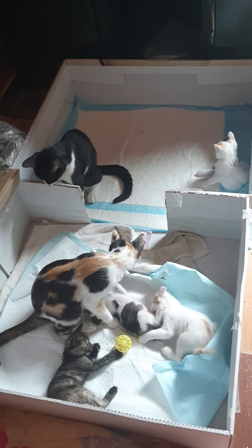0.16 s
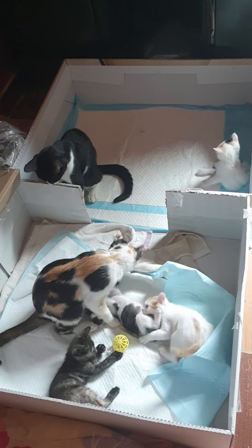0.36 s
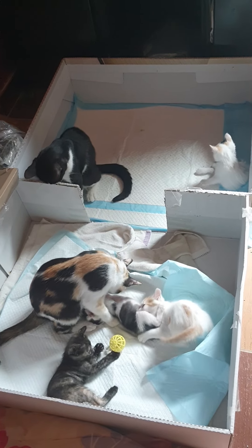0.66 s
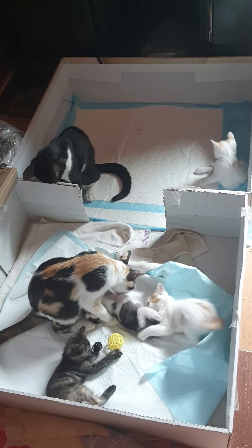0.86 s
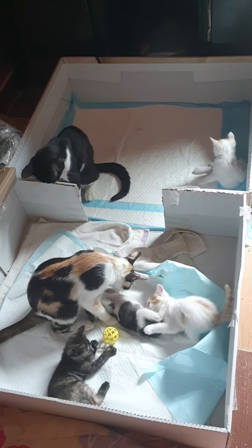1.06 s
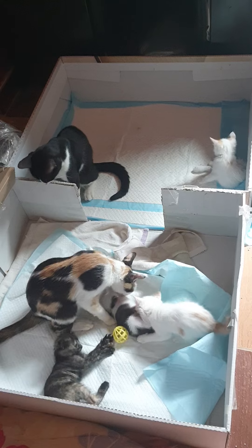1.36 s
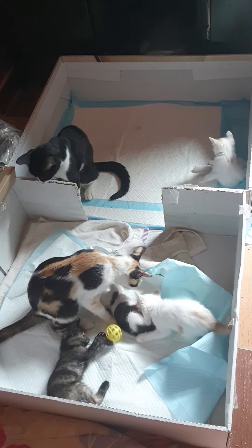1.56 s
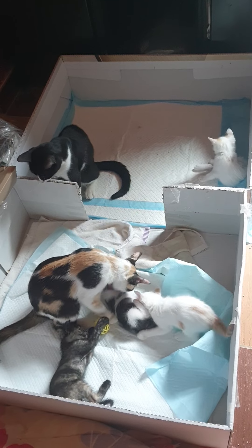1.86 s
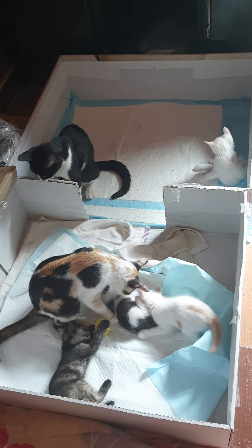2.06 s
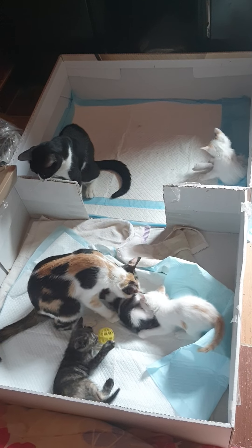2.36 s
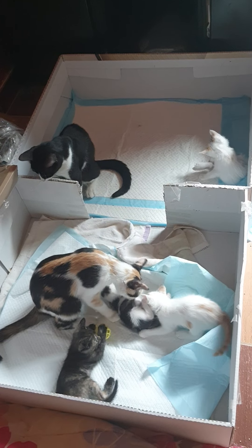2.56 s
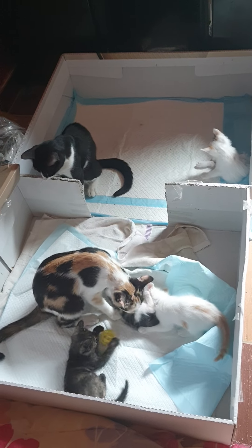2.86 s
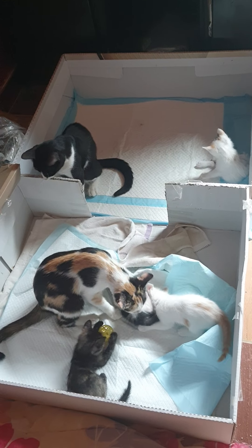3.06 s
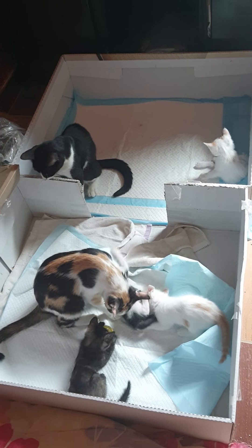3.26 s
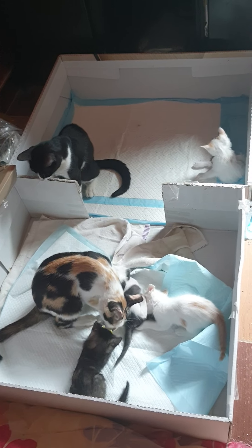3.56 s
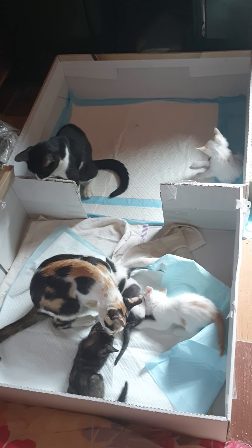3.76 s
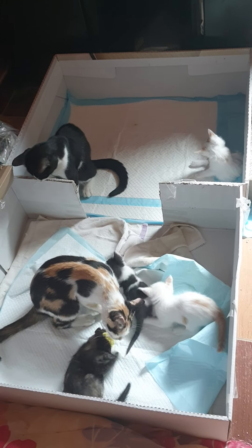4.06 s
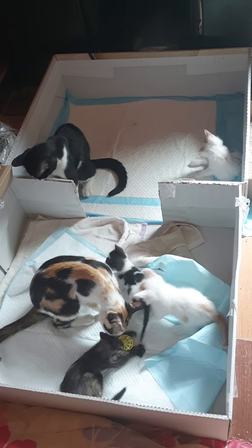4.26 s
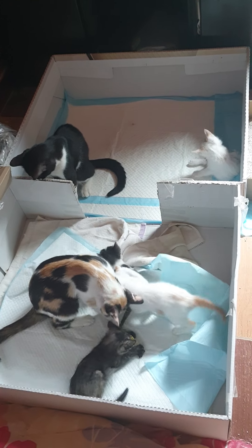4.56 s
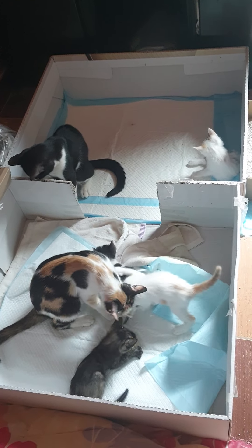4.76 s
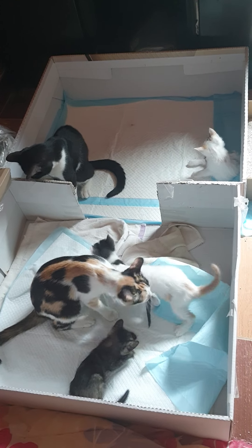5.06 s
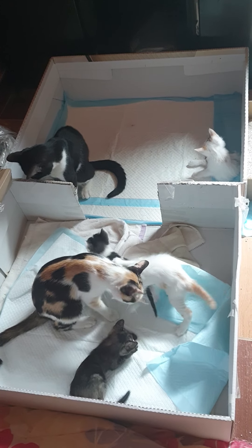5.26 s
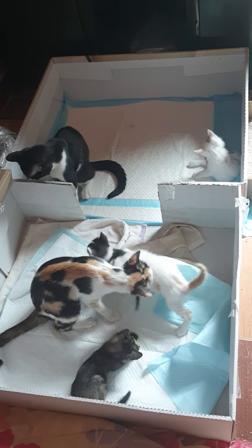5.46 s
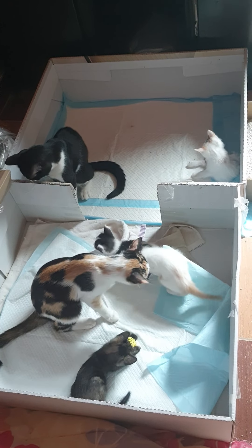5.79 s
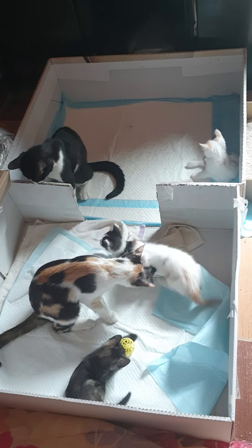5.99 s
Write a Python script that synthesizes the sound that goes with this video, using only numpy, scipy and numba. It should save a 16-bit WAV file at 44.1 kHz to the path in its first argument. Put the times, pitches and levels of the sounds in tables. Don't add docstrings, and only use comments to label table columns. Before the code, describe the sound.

Faint high jingles, thin plastic clicks and crinkling pads come from kittens wrestling in a cardboard pen. Flurries at the start, near the middle and again after four seconds are separated by sparse ticks and quieter dragging. A sharp knock at five seconds and a brief scuffle near the end follow. A constant throbbing low motor drone and airy room noise lie behind, in a small close space, heavier in the right channel.

```python
import sys
import numpy as np
from scipy import signal
from scipy.fft import rfft, irfft, next_fast_len
from scipy.io import wavfile
from scipy.ndimage import uniform_filter1d
from numba import njit

SR = 44100
rng = np.random.default_rng(int(sys.argv[2]) if len(sys.argv) > 2 else 0)


def decibels_to_gain(level_db):
    exponent = np.asarray(level_db, float) / 20
    return 10 ** exponent


def log_audio(samples):
    frames = np.atleast_2d(samples).T
    limited = np.clip(frames, -1, 1)
    pcm = np.round(limited * 32767).astype(np.int16)
    wavfile.write(sys.argv[1], SR, pcm)


N = 270393

# frequency in Hz, right-port level
# in dB rms, left minus right in dB, time in seconds at which it is in step with the first line.
MOTOR_LINES = [(115.98, -43.1, -11.1, 3.0), (112.33, -52.4, -7.5, 3.0412), (111.71, -55.5, -8.5, 2.9725),
               (119.97, -60.3, -8.1, 2.9279), (119.63, -66.5, -5.1, 3.0607), (116.59, -68.1, -5.1, 2.3034),
               (57.99, -53.5, -9.4, 3.0043), (55.86, -56.5, -10.0, 3.0066), (78.46, -63.7, -7.7, 3.0003),
               (87.94, -67.9, -5.8, 3.0121), (101.79, -68.2, -9.3, 2.9899), (167.52, -67.8, -8.3, 2.9944),
               (173.93, -66.8, -7.8, 3.0105), (231.96, -71.5, -8.2, 3.0), (289.64, -72, -11, 3.0),
               (347.97, -74.3, -10.9, 3.0)]


def curve(table, hz):
    table = np.array(table, float)
    return np.interp(np.log(hz + 1), np.log(table[:, 0] + 1), table[:, 1])


def colour(x, gain):
    size = next_fast_len(N, real=True)
    hz = np.arange(size // 2 + 1) * SR / size
    return irfft(rfft(x, size) * gain(hz), size)[..., :N]


def unit(x):
    return x / np.sqrt(np.mean(x ** 2))


def walk(rate):
    hold = int(SR / rate)
    steps = np.repeat(rng.standard_normal(N // hold + 1), hold)
    return uniform_filter1d(uniform_filter1d(steps, hold), hold)[:N]


def ports(pan_db):
    left = decibels_to_gain(np.asarray(pan_db))
    return 2 * np.array([left, np.ones_like(left)]) / (1 + left)


def pen(x, t60, wet_db):
    t = np.arange(int(.4 * SR)) / SR
    tail = rng.standard_normal((2, len(t))) * np.exp(-np.log(1000) * t / t60) * (t > .002)
    tail = tail / np.sqrt(np.sum(tail ** 2, axis=1, keepdims=True))
    return x + decibels_to_gain(wet_db) * signal.fftconvolve(x, tail, axes=1)[:, :N]


@njit
def shell(strike, chatter, roll, pole, keep):
    out, z = np.empty(len(strike)), 0j
    for i in range(len(strike)):
        z = z * pole[i] * roll[i] + chatter[i]
        if strike[i] != 0:
            z = z * keep + strike[i]
        out[i] = z.imag
    return out


def grazes(depth):
    roll = np.ones(N, complex)
    when, size, skip = rng.random((1200, 3)).T
    roll[(when * N).astype(int)] = (0.93 + 0.17 * size) * np.exp(3.5j * depth * (skip - .5))
    return roll


def bell():
    mode_hz = [
        [6831, 6640, 7120],
        [3410, 3500],
        [2975],
        [6000],
        [4590, 5470],
        [13815, 13380, 14095],
        [11580],
    ]
    # level in dB, share of the ring-out, pitch wobble as a share, graze depth in radians.
    modes = [
        [(-1, 0.89, 0.00018, 0.56), (-8, 0.17, 0.0089, 1.1), (-10, 0.18, 0.014, 1.4)],
        [(-3, 1.46, 0.0039, 2.16), (-5.5, 0.64, 0.0078, 1.9)],
        [(-2, 1.84, 0.012, 3.3)],
        [(-4.5, 1.04, 0.0034, 2.3)],
        [(0, 1.2, 0.0078, 2.3), (-6, 0.3, 0.0068, 0.97)],
        [(-5, 0.92, 0.001, 0.97), (-13, 0.5, 0.01, 1.8), (-15, 1, 0.0049, 1.6)],
        [(-0.5, 1.4, 0.0062, 3.3)],
    ]
    # time in seconds, level in dB, ring-out t60 in seconds.
    ring_hits = [(0.113, -57, 0.2), (0.1324, -54.5, 0.18), (0.162, -52, 0.21), (0.183, -46.5, 0.21),
                 (0.2392, -52, 0.47), (0.3057, -44, 0.11), (0.333, -41.5, 0.23), (0.4248, -58, 0.14),
                 (0.583, -65, 0.41), (0.6719, -56, 0.11), (0.7085, -63, 0.16), (0.838, -60, 0.18),
                 (0.9043, -67, 0.18), (1.0164, -56, 0.15), (1.046, -54, 0.21), (1.0816, -55, 0.32),
                 (1.1354, -47, 0.12), (1.2733, -62.5, 0.16), (1.3217, -59.5, 0.31), (1.379, -58, 0.33),
                 (1.4187, -49, 0.2), (1.481, -59, 0.18), (1.5025, -45, 0.11), (1.5341, -47.5, 0.15),
                 (1.5957, -63, 0.32), (1.6976, -55, 0.11), (1.7251, -62, 0.18), (1.8005, -59, 0.15),
                 (1.8584, -57.5, 0.4), (1.947, -61, 0.2), (2.0817, -64, 0.17), (2.1032, -63, 0.21),
                 (6.005, -66, 0.15), (2.494, -53, 0.2), (2.5113, -40, 0.22), (2.5426, -38, 0.074),
                 (2.6476, -56, 0.18), (2.6596, -51, 0.19), (2.709, -47.5, 0.1), (2.817, -59, 0.44),
                 (2.983, -47, 0.068), (3.0143, -46.5, 0.18), (3.1652, -59.5, 0.22), (3.2084, -58, 0.15),
                 (3.237, -69, 0.16), (3.5728, -69, 0.13), (4.074, -66, 0.18), (4.0914, -60.5, 0.28),
                 (4.1904, -66, 0.18), (4.207, -53, 0.21), (4.2385, -50, 0.17), (4.26, -46.5, .12),
                 (4.3291, -66, 0.18), (4.343, -59, 0.18), (4.369, -50, 0.18), (4.3829, -49.5, 0.21),
                 (4.4276, -53, 0.11), (4.4755, -63, 0.16), (4.5131, -43, 0.049), (4.5621, -51, 0.25)]
    slot_hits = [(0.0168, -60.5, 0.36), (0.1061, -52, 0.15), (0.1779, -64, 0.21), (1.1158, -57.5, 0.16),
                 (1.3707, -73, 0.15), (1.3921, -69, 0.15), (1.4081, -64, 0.2), (1.5762, -65, 0.15),
                 (1.699, -67, 0.13), (1.727, -45.5, 0.15), (1.7957, -52, 0.073), (2.5405, -60.5, 0.21),
                 (2.6593, -52, 0.1), (2.6912, -54.5, 0.16), (2.8418, -65, 0.1), (2.9546, -62.5, 0.2),
                 (2.978, -59, 0.13), (3.1157, -64.5, 0.094), (4.0825, -71, 0.15), (4.2521, -47, 0.066),
                 (4.2746, -58.5, 0.23), (4.374, -54, 0.2), (4.41, -59.5, 0.18), (4.556, -66, 0.16)]
    lowest_hits = [(1.3627, -71, 0.15), (1.44, -65, 0.27), (1.6156, -66, 0.14), (1.6989, -65, 0.15),
                   (1.7348, -72, 0.15), (1.8022, -55, 0.074), (1.856, -65, 0.19), (2.518, -57.5, 0.16),
                   (2.545, -51.5, 0.11), (2.6283, -77, 0.13), (2.6607, -60.5, 0.14), (2.842, -64, 0.16),
                   (2.978, -63, 0.23), (3.2075, -82, 0.15), (4.0955, -74, 0.17), (4.211, -59, 0.15),
                   (4.2387, -55, 0.15), (4.2628, -56.5, 0.13), (4.369, -55, 0.098), (4.406, -60, 0.1),
                   (4.5554, -60.5, 0.13), (4.6128, -69, 0.21), (6.01, -65, .15)]
    sixth_hits = [(0.1066, -66, 0.18), (0.152, -59, 0.18), (0.2472, -68, 0.18), (0.2767, -56, 0.2),
                  (0.3106, -68, 0.18), (0.3335, -64, 0.2), (0.356, -55, 0.18), (1.1487, -56, 0.18),
                  (1.7249, -62, 0.18), (1.7576, -59, 0.18), (2.5071, -69, 0.18), (2.5405, -52, 0.2),
                  (2.68, -50, .2), (3.035, -60, .2), (2.6598, -49, 0.23), (2.976, -58, 0.18),
                  (3.011, -57, 0.18), (3.1586, -72, 0.18), (3.1776, -58, 0.18), (4.0975, -71, 0.18),
                  (4.1329, -58, 0.18), (4.1983, -62, 0.18), (4.2167, -56, 0.18), (4.2501, -56, 0.18),
                  (4.3403, -53, 0.29), (4.5549, -65, 0.18), (5.99, -63, .3)]
    middle_hits = [(0.105, -60, 0.12), (1.7249, -60, 0.16), (1.8003, -62, 0.1), (2.5405, -65, 0.12),
                   (2.6595, -58, 0.12), (2.68, -62, 0.18), (2.7017, -60, 0.15), (4.3, -63, .12),
                   (4.37, -60, 0.19), (4.2106, -60, 0.13), (4.2497, -52, 0.1), (4.2794, -67, 0.12),
                   (4.5542, -60, 0.12)]
    top_hits = [(0.0852, -63, 0.15), (0.1072, -57, 0.15), (0.1226, -49, 0.15), (0.1875, -54, 0.15),
                (0.2733, -51, 0.15), (0.3328, -45, 0.18), (0.6729, -56, 0.15), (0.8395, -55, 0.15),
                (1.056, -54, 0.15), (1.0779, -52, 0.16), (1.1343, -50, 0.17), (1.1517, -49, 0.093),
                (1.2725, -56, 0.17), (1.3623, -54, 0.15), (1.3982, -57, 0.15), (1.5125, -61, 0.15),
                (1.5482, -42, 0.086), (1.6975, -61, 0.17), (1.7255, -55, 0.15), (1.7409, -52, 0.17),
                (1.783, -45.5, 0.16), (1.8587, -59, 0.17), (2.103, -57, 0.14), (2.5102, -54, 0.15),
                (2.5237, -56, 0.15), (2.5531, -44, 0.15), (2.574, -48, 0.097), (2.6604, -49, 0.15),
                (2.7048, -57, 0.12), (2.826, -67, 0.15), (2.8424, -59, 0.15), (2.9382, -59, 0.14),
                (2.9547, -53, 0.15), (2.9761, -55, 0.15), (2.9916, -48, 0.19), (3.1597, -64, 0.15),
                (3.1742, -60, 0.15), (4.2103, -61, 0.15), (4.2512, -44, 0.12), (4.3425, -53, 0.15),
                (4.4358, -52, 0.13), (4.5057, -51, 0.15), (4.5296, -48, 0.15), (4.5545, -50, 0.14)]
    shoulder_hits = [(0.2738, -57, 0.08), (1.2729, -64, 0.08), (1.3622, -56, 0.08), (1.7249, -53.5, 0.044),
                     (1.8053, -58, 0.08), (2.5419, -53, 0.08), (2.6598, -57, 0.1), (2.8414, -61, 0.08),
                     (2.9756, -53, 0.08), (4.2106, -53, 0.074), (4.3644, -55, 0.08), (4.5096, -50, 0.08)]
    family_pans_db = [-13.5, -6.5, -13, -6, 2, -6.5, 2]
    chatters_db = [-17.5, -13, -14, -13, -14, -12, -22]
    chatter_per_s, chatter_t60_s, turn_db = 170, 0.36, 2.5

    families = ring_hits, slot_hits, lowest_hits, sixth_hits, middle_hits, top_hits, shoulder_hits
    out = np.zeros((2, N))
    rattle = (rng.random(N) < chatter_per_s / SR) * rng.standard_normal(N)
    chatter_decay = decibels_to_gain(-60 / (chatter_t60_s * SR))
    for hzs, family, hits, family_pan_db, chatter_db in zip(mode_hz, modes, families, family_pans_db, chatters_db):
        s, db, t60 = np.transpose(sorted(hits))
        at = (s * SR).astype(int)
        latest = np.maximum(np.searchsorted(at, np.arange(N), "right") - 1, 0)
        ring_out = np.clip(t60, .02, .6)[latest]
        pan_db = family_pan_db + turn_db * rng.standard_normal(len(s))
        for hz, (mode_db, share, wobble, graze) in zip(hzs, family):
            loss = np.log(1000) / (share * ring_out * SR)
            pole = np.exp(2j * np.pi * hz * (1 + wobble * walk(25)) / SR - loss)
            roll = grazes(graze)
            scatter_db = 3 * rng.standard_normal((len(s), 2)).T * (hz != hzs[0])
            near = signal.butter(1, [hz - 250, hz + 250], "band", fs=SR, output="sos")
            for port, gain in enumerate(ports(pan_db)):
                strike = np.zeros(N, complex)
                phase = np.exp(2j * np.pi * rng.random(len(s)))
                strike[at] = gain * decibels_to_gain(db + mode_db + scatter_db[port]) * phase
                unrest = signal.lfilter([decibels_to_gain(chatter_db)], [1, -chatter_decay], np.abs(strike))
                ring = shell(strike, rattle * unrest, roll, pole, 0.18)
                out[port] += signal.sosfilt(near, ring)
    return pen(out, t60=0.26, wet_db=-6)


def burst(hz, t60, width):
    t = np.arange(int(.15 * SR)) / SR
    edges = np.clip([hz / (1 + width), hz * (1 + width)], 50, 20000)
    push = rng.standard_normal(len(t)) * np.exp(-np.log(1000) * t / t60)
    push[0] = 1.5
    x = signal.sosfilt(signal.butter(3, edges, "band", fs=SR, output="sos"), push)
    return x / np.abs(x).max()


def add(out, x, s):
    i = int(s * SR)
    out[:, i:i + x.shape[1]] += x[:, :N - i]


def contacts():
    # time in seconds, peak in dB, centre in
    # Hz, broad crack in dB.
    ticks = [(0.2725, -46, 7260, -61), (0.3035, -45, 10400, -73), (0.329, -47, 7300, -73),
             (0.4568, -58, 9960, -86), (0.571, -58, 8200, -80), (0.6814, -57, 7330, -78),
             (0.7085, -48.5, 7300, -78), (0.815, -54, 7510, -73), (0.9537, -50, 7700, -60.5),
             (1.0211, -59, 10400, -76), (1.135, -49, 7150, -66), (1.1904, -69, 7480, -61.5),
             (1.2726, -60, 11600, -69), (1.3622, -54, 11500, -62), (1.398, -49, 7200, -70),
             (1.466, -52, 10500, -59), (1.503, -50, 7220, -68), (1.53, -48, 7540, -73),
             (1.6172, -69, 10700, -73), (1.698, -50, 7950, -68), (1.726, -43, 7300, -58),
             (1.8058, -55, 11600, -65), (1.854, -54, 7250, -74), (1.8821, -50.5, 10500, -75),
             (1.8914, -57, 11000, -77), (2.1021, -64, 7400, -86), (2.5026, -55, 7300, -75),
             (2.5264, -51, 10300, -67), (2.542, -53, 9000, -60), (2.66, -46, 11800, -50.5),
             (2.8409, -59, 11700, -72), (2.9539, -50, 12500, -64), (2.976, -44, 7150, -69),
             (3.3235, -64, 10600, -70), (3.571, -52, 8260, -71), (3.767, -73, 7720, -69),
             (3.9303, -67, 7230, -61), (4.0745, -59, 10600, -71), (4.211, -43.5, 11000, -51.5),
             (4.2507, -50, 9600, -48), (4.342, -42.5, 7600, -59), (4.3507, -41.5, 10200, -66),
             (4.3694, -46, 11500, -57), (4.5036, -42, 10700, -56), (4.556, -54, 7900, -50.5),
             (5.1002, -45.5, 7400, -57), (5.3512, -66, 10600, -86), (5.6725, -60, 10600, -81),
             (5.7235, -61, 10500, -56), (5.939, -61, 11700, -70),
             (2.495, -59, 10400, -78), (2.513, -57, 10800, -74), (2.692, -55, 8000, -70),
               (2.77, -62, 10500, -78), (2.995, -52, 8500, -68), (3.01, -54, 7600, -70),
               (3.03, -59, 8200, -72), (4.222, -52, 7200, -66), (4.512, -49, 10000, -70)]
    # time in seconds, peak in dB, centre in Hz, t60 in seconds, width as a share.
    knocks = [(0.88, -58, 2300, .14, .2), (0.952, -49, 1850, .014, 0.41), (1.002, -64, 1490, 0.03, 0.21),
              (1.466, -50.5, 1900, 0.059, 0.39), (1.646, -44, 940, 0.014, 0.2),
              (1.649, -63, 980, .08, 0.12), (4.96, -46, 334, 0.15, 0.23), (5.1, -47, 716, 0.0087, 0.34),
              (4.253, -45, 3450, .03, .08), (4.253, -48, 4650, .03, 0.067), (4.556, -55, 4600, .03, .08),
              (4.256, -47, 13300, .04, .06), (5.099, -41.5, 2230, 0.012, 0.16),
              (5.1, -55, 5140, 0.14, 0.13), (5.1, -51, 11000, .02, .4), (5.104, -50.5, 2530, 0.2, 0.13),
              (5.109, -51, 2300, 0.16, .2), (5.105, -52, 1750, 0.15, 0.18), (5.112, -61, 7600, 0.17, 0.23),
              (5.7235, -46, 4600, .015, 0.14), (5.7253, -47, 1400, 0.014, 0.45),
              (5.76, -46.5, 800, 0.038, 0.89), (5.786, -44, 5200, .02, .3), (5.8, -49.5, 705, 0.035, 0.85),
              (5.825, -45.5, 3630, 0.036, 0.45)]
    out = np.zeros((2, N))
    for s, db, hz, crack_db in ticks:
        ring = decibels_to_gain(db + 1.6) * burst(hz, 0.022, 0.096)
        snap = decibels_to_gain(db + 2) * burst(10500, .004, 0.66)
        crack = decibels_to_gain(crack_db + 15.5) * burst(6400, 0.0058, 0.49)
        pan_db = -10.5 + 0.5 * rng.standard_normal()
        add(out, np.outer(ports(pan_db), ring + snap + crack), s)
    for s, db, hz, t60, width in knocks:
        add(out, np.outer(ports(-4.5), decibels_to_gain(db) * burst(hz, t60, width)), s)
    return pen(out, t60=0.29, wet_db=-6)


def rustle():
    # start in seconds, hold in seconds, level in dB, dullness in dB.
    drags = [(0, 0.14, -70.5, -6), (0.149, 0.044, -64.5, 0), (0.222, 0.15, -72.5, 5.5),
             (0.592, 0.049, -73.5, 2), (0.673, .05, -83, -2), (0.837, 0.12, -69, 3),
             (1.002, 0.16, -75.5, 0), (1.364, 0.18, -70.5, 2), (1.29, 0.055, -76, -9),
             (1.537, 0.4, -77, -10), (2.106, 0.023, -84, -6), (1.64, 0.083, -82, 16.5),
             (2.499, 0.054, -71.5, -14), (2.665, 0.21, -75, 2), (2.935, 0.28, -78.5, -10),
             (2.974, 0.032, -71, -6), (3.205, 0.023, -74, 6.5), (3.344, 0.028, -69, 3),
             (3.574, 0.017, -76, -3), (3.88, 0.15, -76.5, 5.5), (4.08, 0.063, -71, -5),
             (4.209, 0.045, -64, -1.5), (4.34, 0.076, -66, -4), (4.458, 0.17, -72, 1),
             (5.104, 0.07, -84, 20), (5.042, 0.059, -86, 1), (5.247, 0.041, -86, 8), (5.708, .015, -74, -6),
             (5.736, 0.082, -67, 8), (5.955, 0.056, -71.5, -3), (6.032, 0.055, -65, 2)]
    # frequency in Hz, level in dB per Hz.
    crinkle = [(2500, -11.5), (3900, -5), (5300, -0.5), (7000, 2.5), (13000, 1), (15800, 0.5)]
    padding = [(400, 13.5), (900, 6.5), (1500, 0.5), (2400, 1.5), (3600, -6), (5500, -22)]
    grip_db_per_s, let_go_db_per_s = 420, 150
    rest_db, rest_dull_db = -87.5, 11
    spread_db, flicker_db = 1.6, 1.4

    t = np.arange(N) / SR
    crisp, soft = decibels_to_gain(2 * rest_db), decibels_to_gain(2 * (rest_db + rest_dull_db))
    for s, hold, db, dull_db in drags:
        swell_db = grip_db_per_s * (s - t)
        die_db = let_go_db_per_s * (t - s - hold)
        power = decibels_to_gain(2 * (db - np.maximum(0, np.maximum(swell_db, die_db))))
        crisp = crisp + power
        soft = soft + power * decibels_to_gain(2 * dull_db)
    snaps = rng.random((2, N)) < 1800 / SR
    size_db = spread_db * np.minimum(rng.exponential(size=(2, N)), 4)
    creases = snaps * decibels_to_gain(size_db) * rng.standard_normal((2, N))
    creases = creases * decibels_to_gain(flicker_db * walk(40))
    film = unit(colour(creases, lambda f: decibels_to_gain(curve(crinkle, f)) * (f > 1500)))
    pad = unit(colour(creases, lambda f: decibels_to_gain(curve(padding, f)) * (f > 250)))
    film = decibels_to_gain(6.5) * np.sqrt(crisp) * film * ports(-5.0)[:, None]
    pad = decibels_to_gain(1.72) * np.sqrt(soft) * pad * ports(-8.5)[:, None]
    return pen(film + pad, t60=0.044, wet_db=0)


def motors():
    # time in seconds, level change in dB.
    load = [(0, -0.2), (.8, 1.9), (1.3, 0), (2.4, 0.5), (3.0, -0.9), (3.9, -.6), (4.6, -0.5), (5.3, .3),
            (6.13, 0.7)]
    # time in seconds, level in dB rms.
    pump_level = [(0, -59), (0.5, -44.5), (1.4, -54), (1.8, -61), (2.6, -52), (3.2, -64), (4.0, -71),
                  (4.4, -64), (4.8, -69), (6.13, -59)]
    t, lead, out = np.arange(N) / SR, MOTOR_LINES[0][0], 0
    load_db = np.interp(t, *np.transpose(load))
    for hz, db, pan_db, s in MOTOR_LINES:
        line = np.sqrt(2) * np.sin(2 * np.pi * (lead * t + (hz - lead) * (t - s)))
        level = decibels_to_gain(db + load_db + 0.15 * walk(2.1))
        out = out + np.outer([decibels_to_gain(pan_db), 1], level * line)
    pump = np.sqrt(2) * np.cos(2 * np.pi * 91.48 * t)
    pump = decibels_to_gain(np.interp(t, *np.transpose(pump_level))) * pump
    return out + np.outer([decibels_to_gain(-10.0), 1], pump)


def air():
    # frequency in Hz, level in dB per Hz.
    spectrum = [(25, -40), (40, -20), (55, -5), (90, -7), (145, -14.5), (206, -17), (340, -18), (520, -24),
                (754, -32.5), (1480, -35), (3820, -54.5), (5880, -55.5), (7310, -47), (13200, -56)]
    # frequency in Hz, left minus right in dB.
    air_pan = [(60, -15.5), (110, -13.5), (200, -8), (380, -4.5), (700, -7.5), (1290, -14), (2380, -11),
               (4400, -4), (8120, -23), (15000, -22)]
    # frequency in Hz, likeness of the two ports from 0 to 1.
    likeness = [(130, 0.83), (290, 0.9), (640, 0.37), (1400, 0.1)]
    # frequency in Hz, width in Hz, boost in dB.
    room_modes = [(141, 16, 7.5), (172, 6.6, 9.5), (186, 8.2, 5), (234.6, 13, 5), (283.6, 12.5, 4.5),
                  (321, 6.4, 7.5), (363.4, 12, 4), (422.3, 16.4, 6.5),  (551, 12, 4.5), (680, 27, 6),
                  (699, 14, 2), (847, 26, 8.5), (953, 22, 2), (1113, 18, 5.5), (1372, 28, 4.5),
                  (125.4, 15.7, -11), (67.7, 7.6, -10)]
    throb_depth_db, throb_top_hz, throb_lag_s = 2, 300, 0.018

    lead, second, in_step_s = MOTOR_LINES[0][0], MOTOR_LINES[1][0], MOTOR_LINES[1][-1]
    since_step = np.arange(N) / SR - in_step_s - throb_lag_s
    throb_db = throb_depth_db * np.cos(2 * np.pi * (lead - second) * since_step)
    out = 0
    for hz in 30 * 2. ** np.arange(10):
        alike = np.clip(curve(likeness, hz), 0, 1)
        common, *own = rng.standard_normal((3, N))
        pair = np.sqrt(alike) * common + np.sqrt(1 - alike) * np.array(own)
        octave = lambda f: np.cos(np.pi / 2 * np.clip(np.log2((f + 1) / hz), -1, 1))
        flicker_db = 1.3 * walk(6) + throb_db * (hz < throb_top_hz)
        out = out + decibels_to_gain(flicker_db) * colour(pair, octave)

    def room(f):
        standing_db = sum(db / (1 + (2 * (f - hz) / width) ** 2) for hz, width, db in room_modes)
        return decibels_to_gain(curve(spectrum, f) + standing_db) * ports(curve(air_pan, f))

    return decibels_to_gain(-51) * unit(colour(out, room))


def scene():
    return bell() + contacts() + rustle() + motors() + air()


def top_cut(x):
    return signal.sosfilt(signal.butter(12, 16200, fs=SR, output="sos"), x)


def record(dry):
    pair = np.array([np.roll(dry[0], 3), dry[1]])
    mix = signal.sosfilt(signal.ellip(8, .2, 25, 15750, fs=SR, output="sos"), pair)
    return top_cut(mix)


dry = scene()
out = record(dry)
log_audio(out)
```